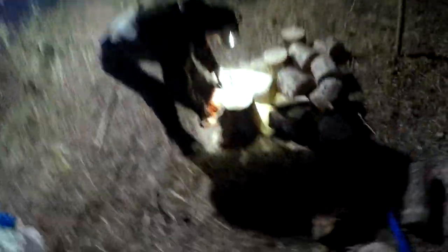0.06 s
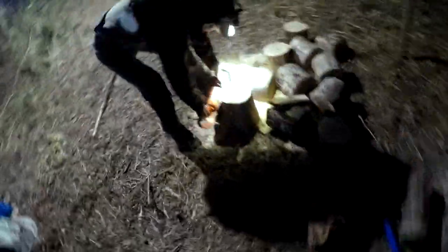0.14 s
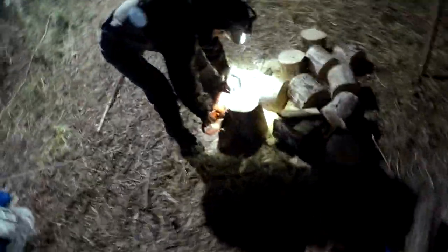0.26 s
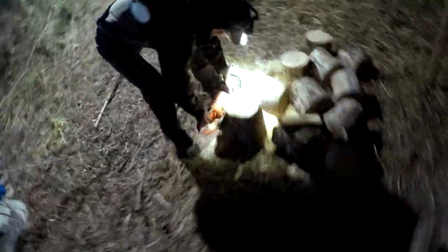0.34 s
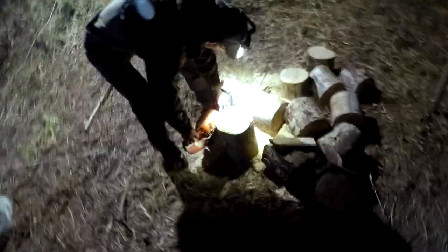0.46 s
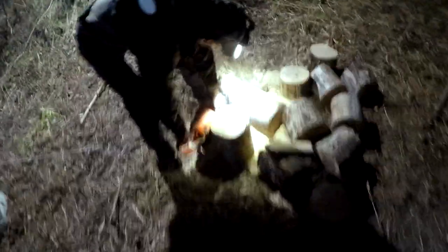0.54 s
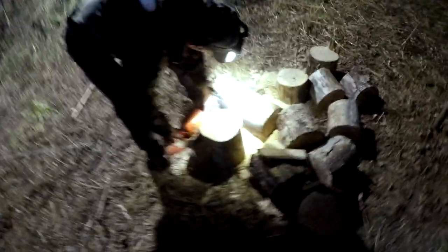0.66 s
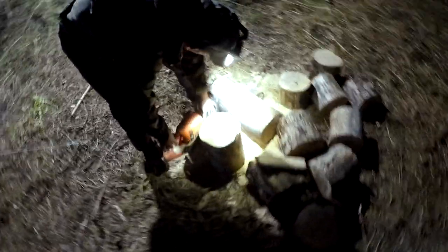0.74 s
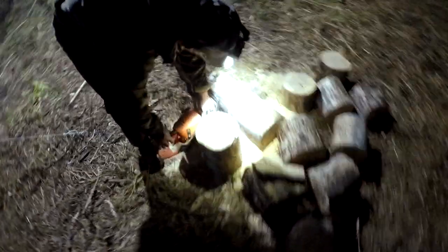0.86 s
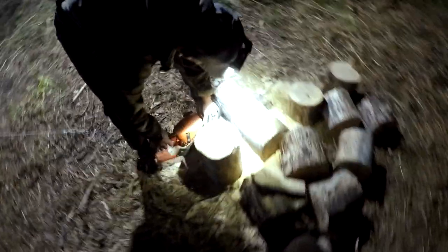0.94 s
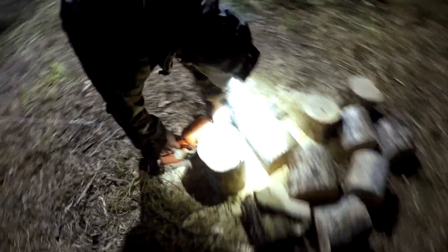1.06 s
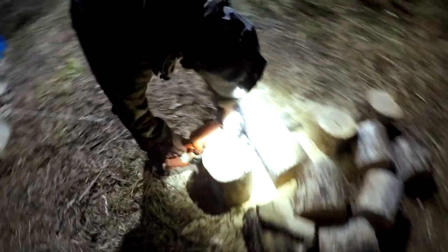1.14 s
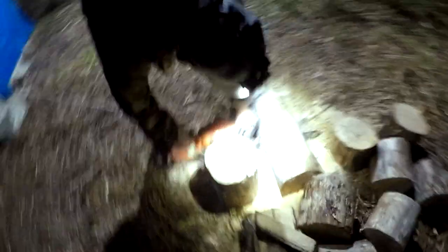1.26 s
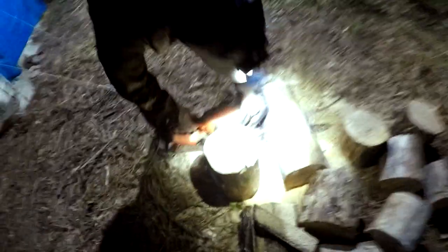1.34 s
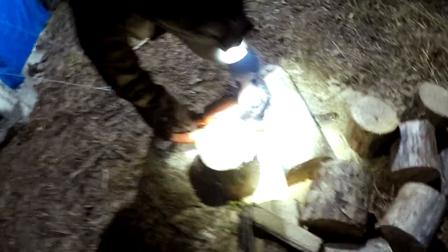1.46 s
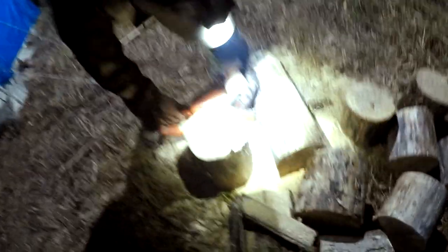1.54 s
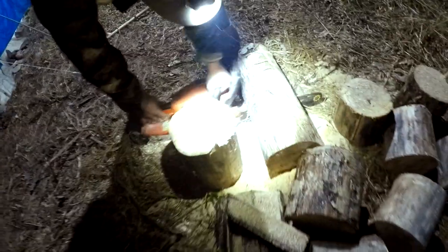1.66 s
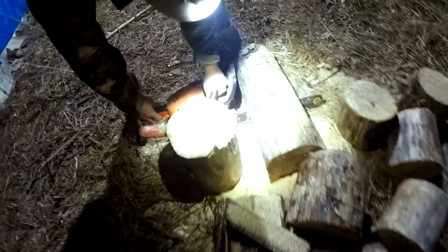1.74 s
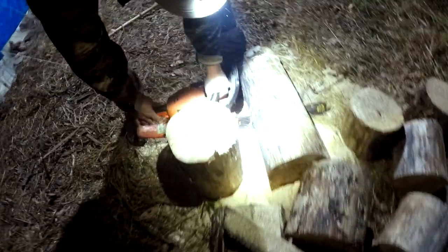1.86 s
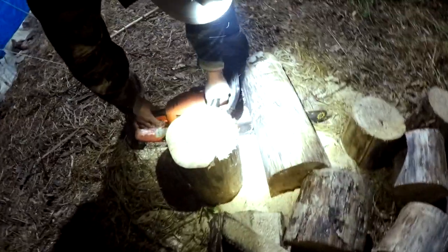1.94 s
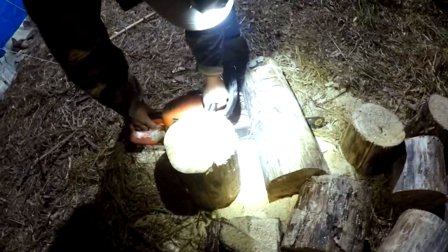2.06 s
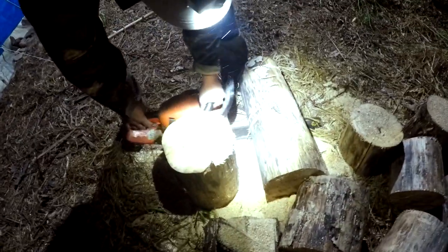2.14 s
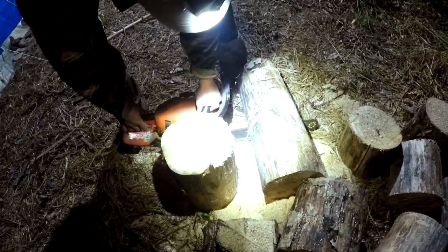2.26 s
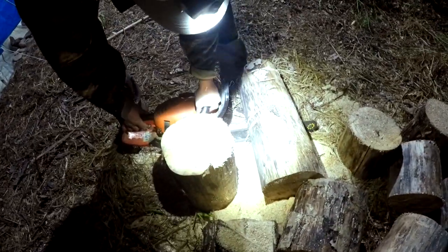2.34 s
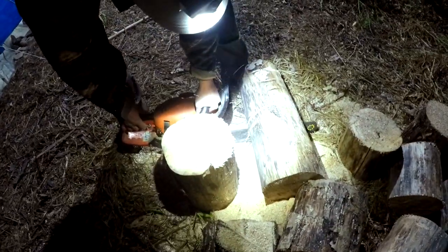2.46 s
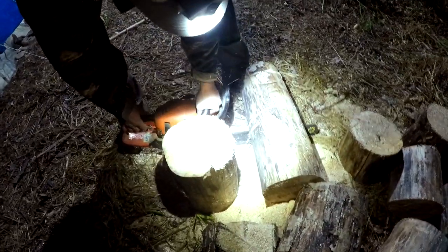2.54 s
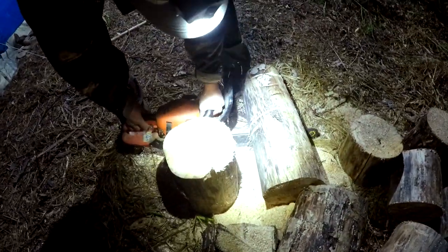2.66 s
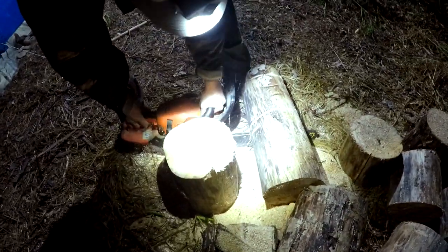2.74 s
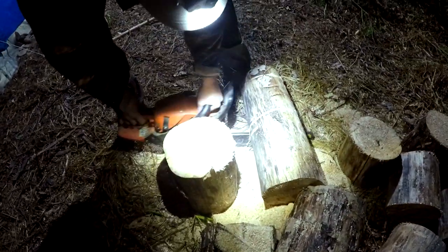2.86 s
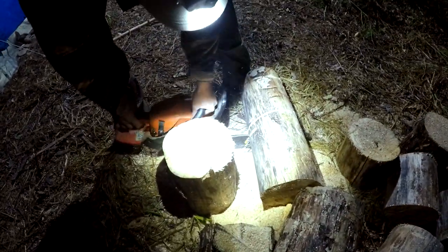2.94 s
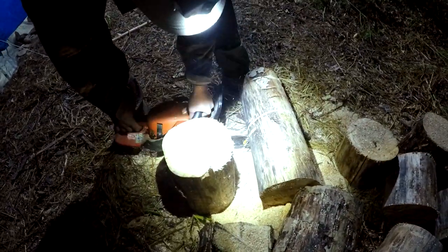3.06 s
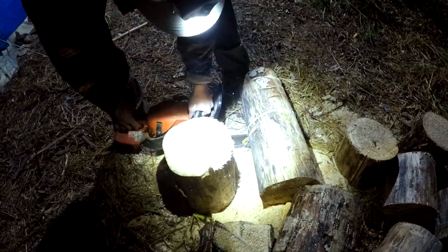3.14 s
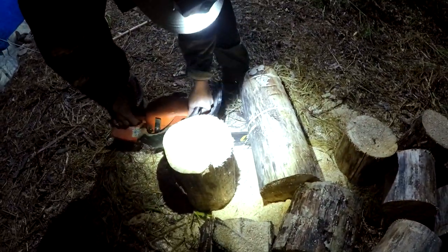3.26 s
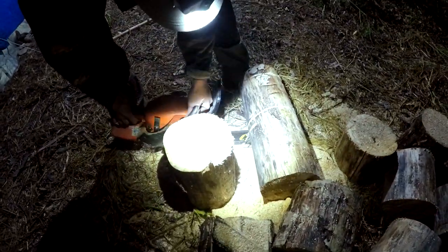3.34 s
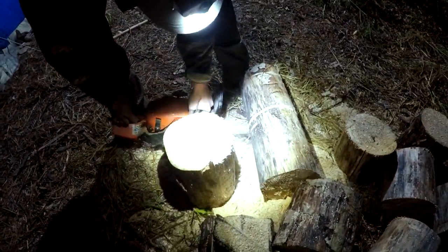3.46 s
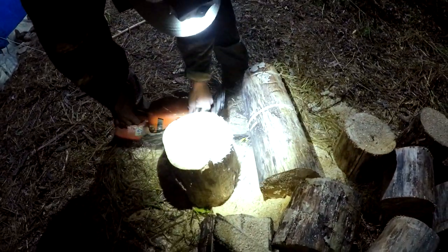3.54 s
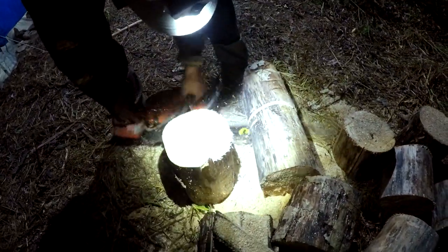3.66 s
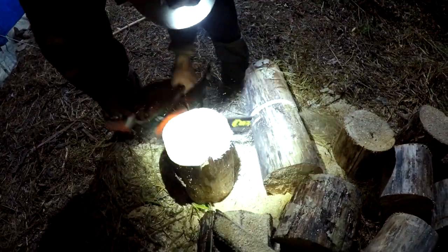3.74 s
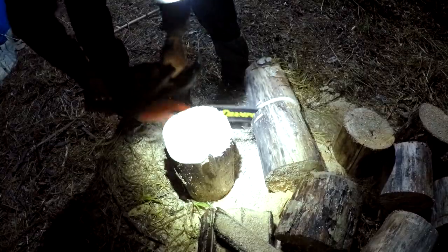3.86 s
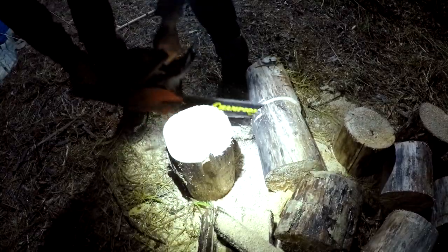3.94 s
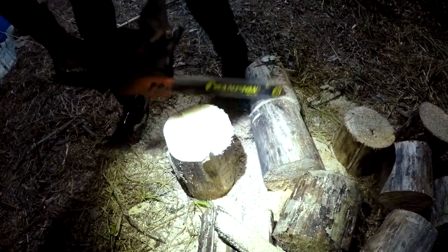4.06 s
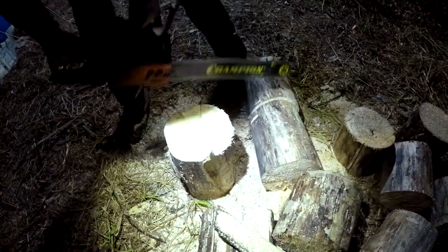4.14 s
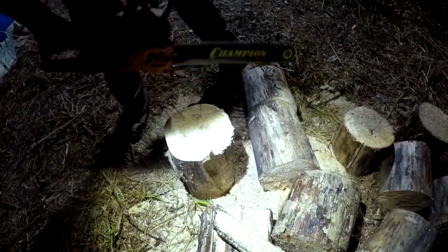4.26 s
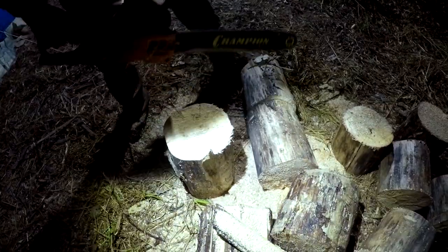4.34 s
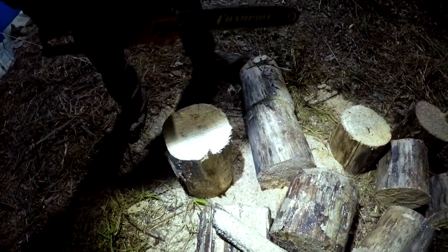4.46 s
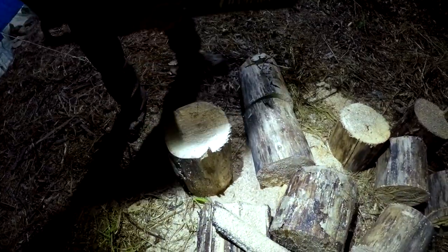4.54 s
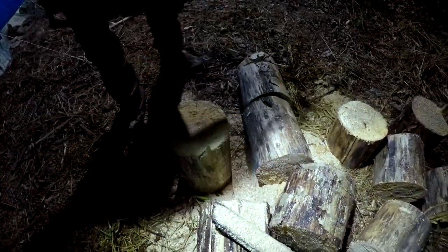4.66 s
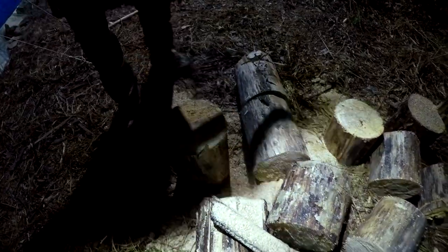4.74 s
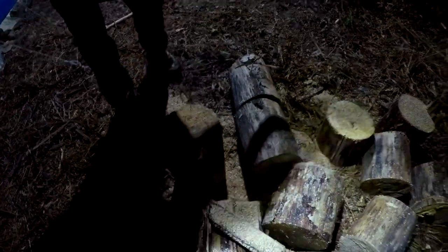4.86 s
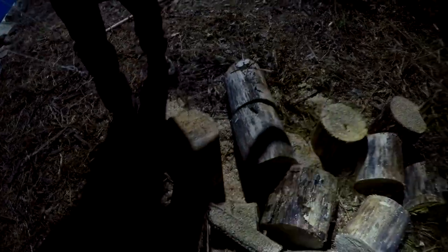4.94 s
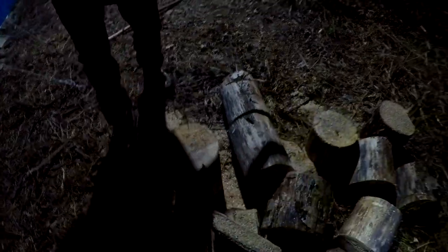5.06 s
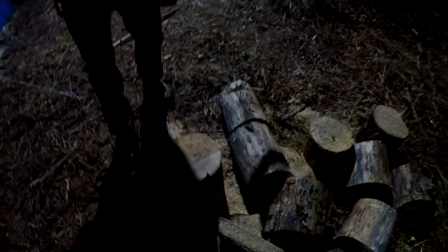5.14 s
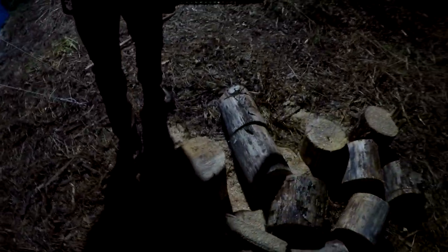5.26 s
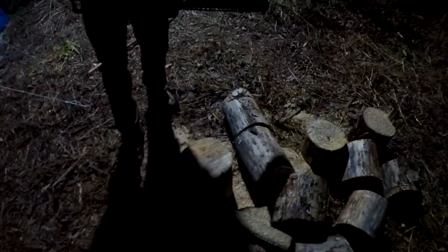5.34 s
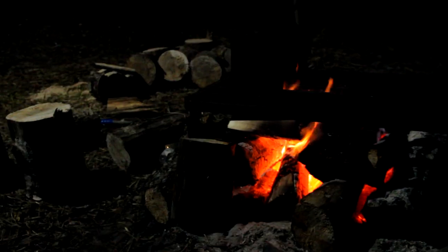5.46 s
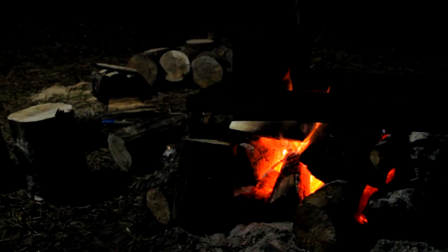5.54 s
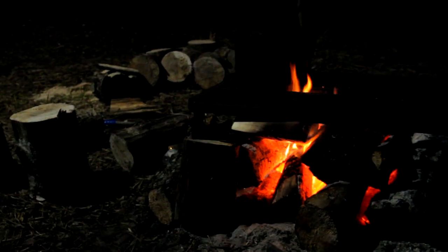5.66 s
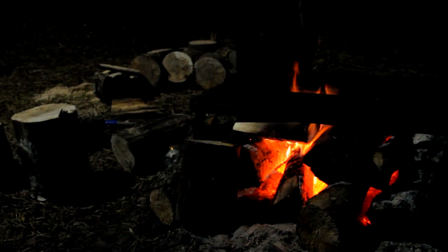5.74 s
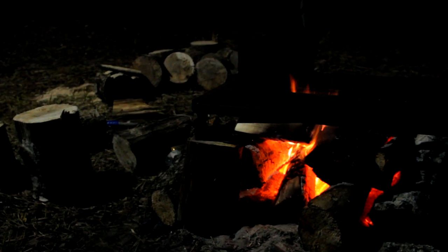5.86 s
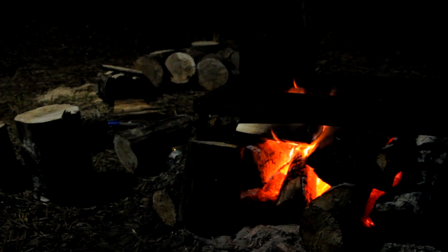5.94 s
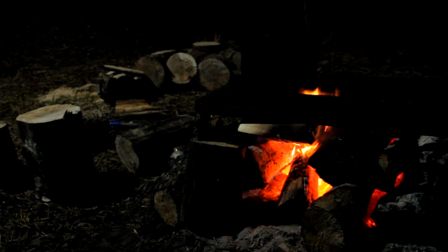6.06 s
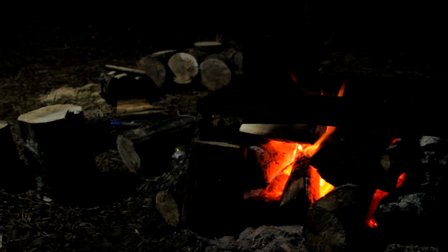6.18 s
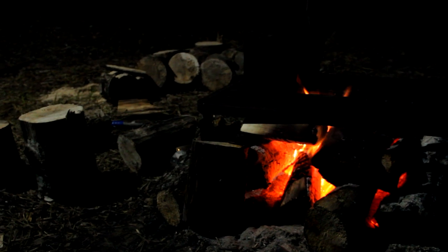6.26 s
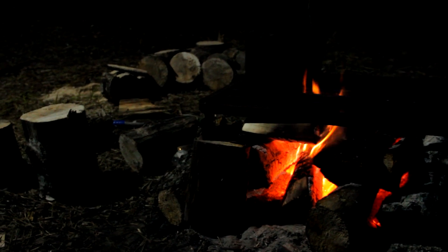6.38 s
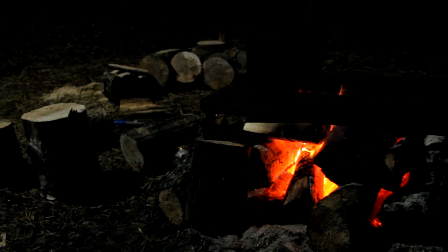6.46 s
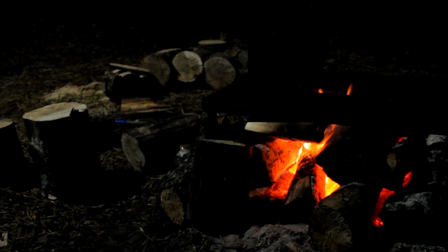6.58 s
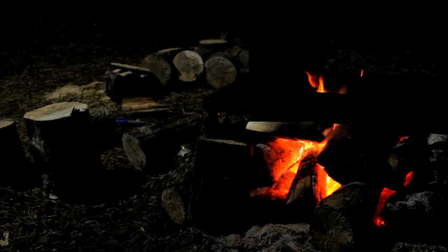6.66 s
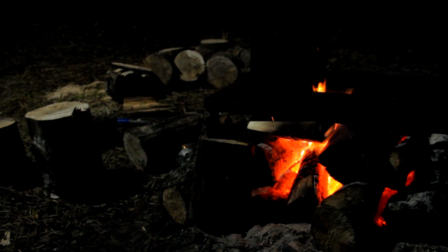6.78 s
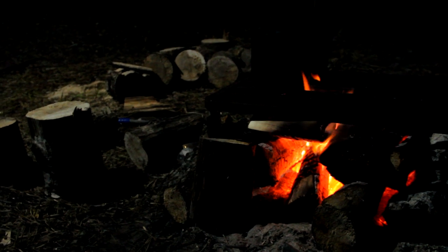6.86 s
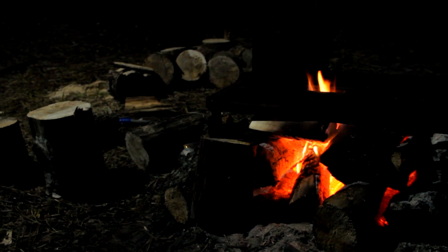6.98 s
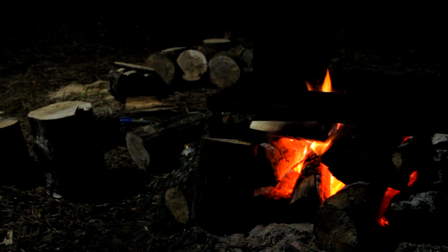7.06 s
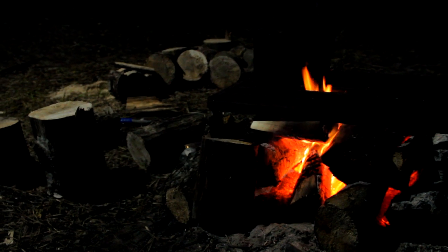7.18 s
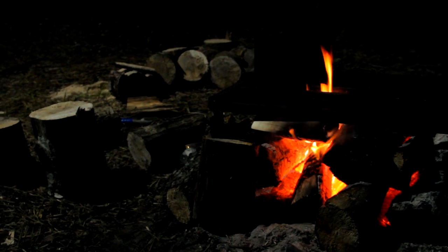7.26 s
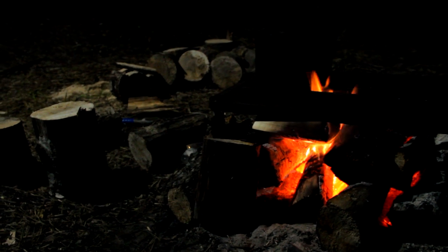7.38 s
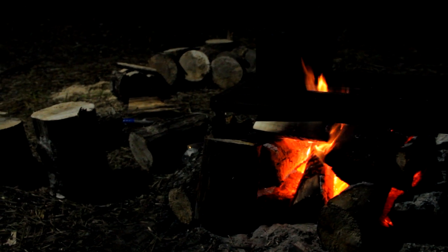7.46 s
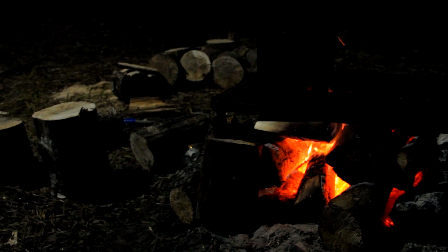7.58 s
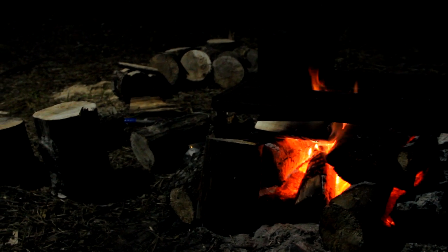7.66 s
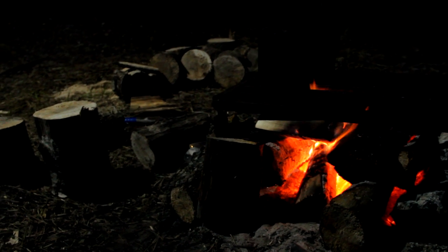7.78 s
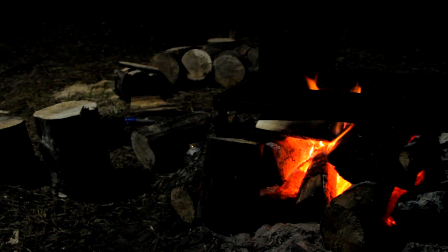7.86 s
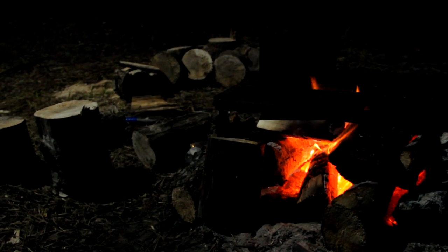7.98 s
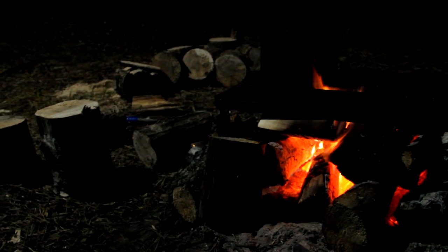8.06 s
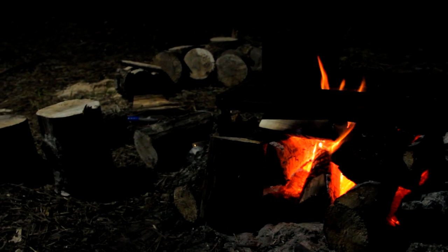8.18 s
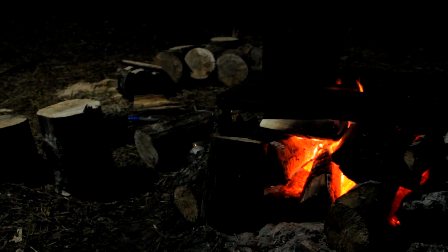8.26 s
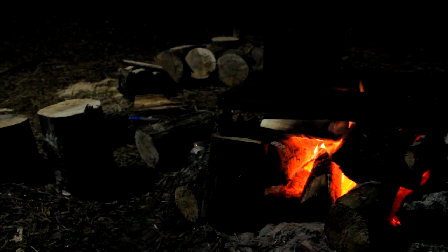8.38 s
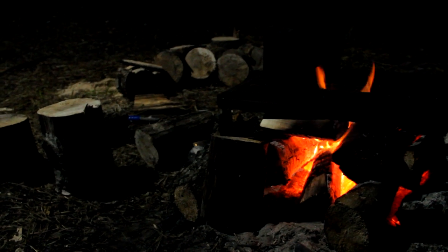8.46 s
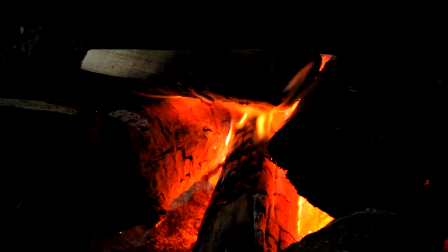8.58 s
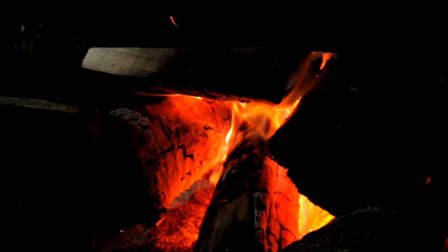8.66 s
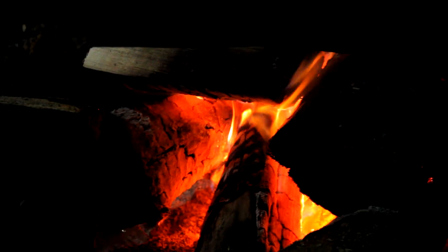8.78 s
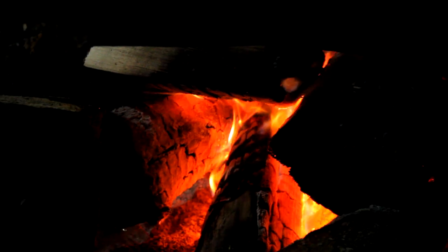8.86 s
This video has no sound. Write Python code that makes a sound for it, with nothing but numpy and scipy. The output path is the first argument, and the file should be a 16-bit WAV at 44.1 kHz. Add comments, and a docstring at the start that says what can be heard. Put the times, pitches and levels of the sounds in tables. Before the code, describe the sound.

A loud, close chainsaw bites through a log in the open air, sagging and recovering while its chain rasps and briefly squeals. The wood gives with a knock, and the engine slows and stalls with last thumps and metallic rattles, uncovering the low drone of a small distant engine. A soft rustle leads into a sudden change to a much quieter spot, where burning wood gently hisses and now and then snaps.

```python
"""Chainsaw and wood stove

A two-stroke chainsaw cuts a log outdoors: exhaust pulses ring its muffler, its chain ticks and squeals,
and its speed sags with the load. It breaks through with a knock, coasts down and stops with a few last
strokes and clanks. Then, abruptly, a quiet spot by a wood stove, where steam hisses and fibres snap.
A small distant engine, probably a generator, drones throughout, heard once the saw no longer masks it."""
import sys
import numpy as np
from scipy import signal
from scipy.fft import rfft, irfft
from scipy.io import wavfile
from scipy.ndimage import uniform_filter1d

SR = 44100
rng = np.random.default_rng(int(sys.argv[2]) if len(sys.argv) > 2 else 0)


def put_to_file(sound):
    """Save the sound as 16-bit audio at rate SR, in the file named by the first command-line argument."""
    columns = np.atleast_2d(sound).T  # one column per channel
    safe = np.clip(columns, -1, 1)
    whole_steps = np.round(safe * 32767)
    wavfile.write(sys.argv[1], SR, whole_steps.astype(np.int16))


N = 393319
T = np.arange(N) / SR

# Crank speed: it sags as the bar is leaned on; out of the wood it hovers at part throttle, then falls.
# Each row: time in seconds, turns per second.
SPEED_CUTTING = [(0.0, 131.8), (0.02, 131.3), (0.1, 135.3), (0.27, 130.9), (0.41, 144.4), (0.55, 138.9),
                 (0.75, 150.7), (1.09, 137.2), (1.21, 137.1), (1.36, 126.2), (1.59, 136.6), (1.71, 139.2),
                 (1.98, 153.5), (2.16, 153.7), (2.54, 142.0), (2.74, 126.6), (2.9, 137.0), (3.19, 133.6),
                 (3.28, 126.8), (3.41, 120.7), (3.53, 110.8), (3.62, 124.7)]
SPEED_RUN_DOWN = [(3.69, 98), (3.75, 91.8), (3.85, 89.8), (4.115, 102), (4.25, 82), (4.39, 62), (4.58, 36)]
# Muffler response: loaded (from behind, then facing it), firing off load, and coasting unfired.
# Each row: frequency in Hz, gain in dB.
MUFFLER_BEHIND = [(250, -44), (430, 2), (550, -23), (700, 0), (820, 6.5), (1000, 5.5), (1200, 2.5),
                  (1480, -16), (1900, -8), (2200, -4), (2600, -13), (3400, -33)]
MUFFLER_FACING = [(250, -24), (335, -3.5), (430, -12), (530, -3.5), (590, -2), (650, 6.5), (700, 5),
                  (750, -0.5), (840, -10.5), (930, -11.5), (1080, -6), (1450, -19), (1650, -15),
                  (2000, -20), (2500, -17), (3400, -42.5)]
MUFFLER_FREE = [(70, -22), (200, 1.5), (290, -7.5), (430, 1.5), (560, 5.5), (720, -4.5), (900, -9),
                (1200, -7), (1550, -11), (2500, -11), (3400, -38)]
MUFFLER_COAST = [(70, -15), (200, -2), (430, -3), (540, -6), (720, 10), (820, -3), (970, -13), (1290, 10),
                 (1550, -17), (3400, -27)]
# Pulse of the exhaust port off load. Each row: multiple of the crank speed, relative level in dB.
PORT_ORDERS = [(3, -4.5), (4, 5.5), (5, -1.5), (6, 3), (7, -2), (8, 3), (9, -7), (10, -1), (11, -4),
               (15, -8.5), (19, -13), (26, -23)]
# The notch that the second harmonic slides through close by. Each row: frequency in Hz, level in dB.
SECOND_NEAR = [(72, -24), (124, -24), (155, -18.5), (200, -18.5), (222, -15.5), (250, -29.5), (268, -21.5),
               (297, -19.5), (308, -19)]
# Spectra of the chain in wood and in air, and of the dull churn of teeth and cooling fan.
# Each row: frequency in Hz, gain in dB.
CHAIN_IN_WOOD = [(820, -26), (1400, -3.5), (2010, -5.5), (2640, -0.5), (2980, -6), (3500, -8.5),
                 (3990, -1.5), (5070, -2), (5900, 3.5), (6460, -1), (7590, -19), (8740, -12), (11200, -35),
                 (12700, -13), (15500, -33)]
CHAIN_IN_AIR = [(820, -24), (1400, -5), (1600, -17), (1800, 0), (2610, -1.5), (3130, -9), (3680, -6.5),
                (3990, -1), (4730, 3), (6270, 2), (7590, -17.5), (8910, -13), (11200, -32.5),
                (12700, -13.5), (15500, -30)]
CHURN_COLOUR = [(25, -32), (70, -16), (130, 5.5), (220, -7.5), (350, -4), (600, -1), (1100, -1.5),
                (1500, -8.5), (2200, -32)]
# Spectra of the outdoor wash and of buffeting air. Each row: frequency in Hz, gain in dB.
WASH_COLOUR = [(30, -16), (90, -6.5), (200, -2.5), (350, -12), (700, -17), (1500, -21.5), (3000, -33.5),
               (5500, -28), (8000, -35.5), (15000, -46)]
GUST_COLOUR = [(10, -12), (30, -3), (80, 0), (130, -5), (1000, -65)]
# Gusts. Each row: time of the peak in seconds, half width in seconds, level in dB.
GUSTS = [(.01, .04, -23), (.39, 0.049, -18), (.565, .04, -14), (.79, 0.054, -21), (1.0, .15, -23),
         (1.25, .03, -22), (3.9, 0.25, -30), (4.85, 0.8, -31), (5.39, 0.14, -27)]
# Three chain squeals and, in the third row, a short pitched knock as the bar breaks through the log.
# Each row: start in seconds, length in seconds, frequency in Hz, peak level in dB.
SQUEALS_AND_KNOCK = [(0.297, 0.25, 2744, -27), (2.66, 0.2, 3260, -35), (3.663, 0.066, 1034, -13.5),
                     (4.486, 0.087, 2550, -21)]
# Last strokes. Each row: start in seconds, relative level in dB, further gain of the thump in dB.
CLANKS = [(4.584, -2.5, 3.5), (4.6164, -1, 1), (4.6655, -2.5, 4), (4.732, -10, 4), (4.8273, -7.5, -7.5),
          (4.859, -13, -2.5), (4.8743, -14.5, -30), (4.9454, -24, -17), (4.9605, -14.5, -3),
          (4.996, -21, -13), (5.025, -24.5, -3), (5.1492, -34.5, 8)]
# Spectra of a chain clank and a piston thump. Each row: frequency in Hz, gain in dB.
CLANK_COLOUR = [(530, -37), (900, -15), (1150, 2.5), (1580, -17), (2600, -1), (3130, -15.5), (5260, 0.5),
                (6660, -2), (7580, -42), (8830, -27), (15000, -46)]
THUMP_COLOUR = [(29, -40), (50, -2), (97, 2.5), (309, -4.5), (388, 0), (492, -24), (609, -2), (932, -25),
                (1200, -22), (1560, -44), (2640, -120)]
# Modes of the bar. Each row: frequency in Hz, relative level in dB, time to fall 60 dB in seconds.
BAR_MODES = [(1170, -14, .03), (2220, 1, .04), (2643, 1, 0.055), (4070, 6.5, 0.059), (4560, 3, .055),
             (4770, 6, 0.026), (5390, 5, 0.026), (5860, 5, 0.044), (6280, 4.5, 0.046)]
# Single notes of the bar that ring on once the chain is slack.
# Each row: start in seconds, frequency in Hz, peak level in dB, time to fall 60 dB in seconds.
BAR_TINGS = [(4.878, 4670, -27, 0.15), (5.03, 4480, -36, 0.36)]
# Envelope of the scuff. Each row: time in seconds, level in dB.
SCUFF_ENVELOPE = [(5.2, -90), (5.33, -48), (5.44, -41), (5.46, -36.5), (5.47, -90)]
# Its spectrum. Each row: frequency in Hz, gain in dB.
SCUFF_COLOUR = [(300, -7), (1000, -1), (3000, -11), (5000, -1), (6300, 0), (7500, -17), (15000, -24)]
# Harmonics of the distant engine. Each row: multiple of the cycle rate, relative level in dB.
DRONE_ORDERS = [(2, -9), (3, -2), (4, -45), (6, -3), (7, -15), (8, -6.5), (9, -11), (10, -26.5), (11, -39),
                (12, -22), (13, -29), (15, -24)]
# Swells of its fifth order. Each row: time of the peak in seconds, half width in seconds, level in dB.
FIFTH_SWELLS = [(5.5, .15, -38.5), (6.2, 0.31, -33), (6.9, 0.33, -35.5), (8.22, 0.21, -33.5),
                (8.9, 0.22, -40)]
# Spectra of the fire's hiss and snaps. Each row: frequency in Hz, gain in dB.
HISS_COLOUR = [(150, -46.5), (250, 4), (287, 1), (324, -13), (366, 0), (399, -5), (443, -5.5), (500, -13),
               (606, -4), (1810, -10.5), (3260, -4), (5580, -17.5), (8170, -19.5), (10200, -21.5),
               (15800, -20.5)]
SNAP_COLOUR = [(1500, -27), (3300, 6), (4500, -9), (8500, -2), (12000, -7), (16000, -1)]
# Snaps of burning wood. Each row: start in seconds, relative level in dB.
SNAPS = [(5.5189, -29), (6.336, -25), (6.409, -15.5), (6.461, -23), (8.109, -23), (8.6796, -23)]
# Stereo spread. Each row: frequency in Hz, level of the side signal relative to the mid in dB.
STEREO_WIDTH = [(7000, -87), (10500, -35), (12000, -2.5), (15500, -18)]

WALK_ROUND_S = 1.05  # the listener walks round to the muffler side over this time
APPROACH_S, APPROACH_TAKES_S = 0.73, 0.39  # and steps up close
THROUGH_S, EASE_S, CLEAR_S = 3.6, 0.14, 0.041  # the bar breaks through; times to ease off and clear the wood
TEAR_S, TEAR_HALF_S, TEAR_DB = 3.69, 0.068, -22  # the last fibres tear with a dull rush
SHUT_S, SHUT_TAKES_S = 4.11, 0.041  # the throttle closes
STALL_S, RUN_OUT_S = 4.563, 0.38  # the engine stalls and the chain runs out
STOVE_S = 5.468  # the scene changes to the stove

ROUGH_FAR, ROUGH_CUT, ROUGH_FREE, ROUGH_COAST = 0.15, 0.06, 0.44, 0.19  # unevenness of the burning, 0-1
SKIP_FREE, SKIP_COAST = 0.94, 0.09  # tendency to fire only on every second turn, 0-1
BOOM_DB, BOOM_FREE_DB, BOOM_CORNER_HZ = -8, -13.5, 78  # the fundamental radiates poorly below the corner
BARK_FAR_DB, BARK_CUT_DB, BARK_FREE_DB, BARK_COAST_DB = -19, -16, -15.5, -13
LUG_HZ, UNLOAD_DB_PER_HZ = 133.4, 0.25  # above this speed the bark softens
LIMP_HZ, LIMP_DB_PER_HZ = 77, 0.15  # below this speed the exhaust puffs weaken
CHAIN_FAR_DB, CHAIN_CUT_DB, CHAIN_FREE_DB, CHAIN_COAST_DB = -20.5, -18.5, -16, -16
BOG_HZ, BOG_DB_PER_HZ = 125, 0.12  # below this speed the chain cuts less
SINK_DB_PER_S = 0.31  # the kerf muffles the chain as the bar sinks in


def amp(db):
    """Amplitude ratio of a level in decibels."""
    return 10 ** (np.asarray(db) / 20)


def unit(x):
    """Normalisation to an rms of 1."""
    return x / np.sqrt(np.mean(x ** 2) + 1e-20)


def steady(x, size=4000):
    """Division by the running rms holds the level at 1 and leaves the fast pulsing."""
    power = uniform_filter1d(uniform_filter1d(x ** 2, size), size // 2)
    return x / np.sqrt(abs(power) + 1e-12)


def lookup(x, rows):
    """Linear interpolation in a two-column table."""
    return np.interp(x, *np.transpose(rows))


def ramp(start_s, takes_s):
    """Linear transition from 0 to 1."""
    return np.clip((T - start_s) / takes_s, 0, 1)


def staged(values, changes):
    """Interpolation from each value to the next as its 0-1 change comes."""
    out = values[0]
    for value, change in zip(values[1:], changes):
        out = out + (value - out) * change
    return out


def swells(rows):
    """Gain made of Gaussian swells that add in power."""
    return np.sqrt(sum(amp(db) ** 2 * np.exp(-2 * ((T - s) / width) ** 2) for s, width, db in rows))


def blend(a, b, share):
    """Equal-power crossfade from a to b."""
    share = np.clip(share, 0, 1)
    return np.sqrt(1 - share) * a + np.sqrt(share) * b


def add(mix, start_s, sound):
    """Superposition of a sound on the mix."""
    part = mix[round(start_s * SR):][:len(sound)]
    part += sound[:len(part)]


def wander(hz):
    """Random fluctuation of rms 1: noise low-passed at the given rate."""
    f = np.fft.rfftfreq(N, 1 / SR)
    return unit(irfft(rfft(rng.standard_normal(N)) / (1 + (f / hz) ** 4), N))


def colour(x, points, size=4096):
    """Minimum-phase filter through the given points of frequency and gain."""
    hz, db = np.transpose(points)
    f = abs(np.fft.fftfreq(size, 1 / SR))
    log_gain = np.log(amp(np.interp(np.log(f + 1), np.log(hz + 1), db)))
    response = np.exp(np.conj(signal.hilbert(log_gain)))
    taps = np.fft.ifft(response).real[:size // 2]
    return signal.oaconvolve(x, taps)[:len(x)]


def noise(points):
    """Gaussian noise of rms 1 with the given spectrum."""
    return unit(colour(rng.standard_normal(N), points))


def patchy(x, depth_db, bins=7, frames=40):
    """Random spectral modulation: the colour shifts in slow, narrow patches."""
    spectra = signal.stft(x, nperseg=1024, noverlap=768)[2]
    field = uniform_filter1d(rng.standard_normal(spectra.shape), bins, axis=0)
    field = unit(uniform_filter1d(field, frames, axis=1))
    return signal.istft(spectra * amp(depth_db * field), nperseg=1024, noverlap=768)[1][:N]


def boom(turns, hz, near, free, skipping, second_far_db=-15.7, burble_db=-6):
    """Periodic firing radiates two low harmonics; period doubling by skipped firings adds order 3/2."""
    angle = 2 * np.pi * turns
    first_db = staged([BOOM_DB, BOOM_FREE_DB], [free]) - 10 * np.log10(1 + (BOOM_CORNER_HZ / hz) ** 7)
    second_db = staged([second_far_db, lookup(2 * hz, SECOND_NEAR)], [near])
    first = amp(first_db + 0.24 * wander(40)) * np.cos(angle - 0.4)
    second = amp(second_db + 1.2 * wander(69)) * np.cos(2 * angle - 1.3)
    burble = skipping * amp(first_db + burble_db + 3.5 * wander(25)) * np.cos(3 * angle / 2)
    return np.sqrt(2) * (first + second + burble)


def exhaust(turns, bark_db, rough, free, skipping, puff_turns=0.52, port_lag_turns=0.035):
    """Source and filter: one uneven pulse and a puff of gas per turn excite the muffler's resonances."""
    shaky_turns = turns + 0.03 * rough * wander(70)
    count = np.floor(shaky_turns)
    strength = (1 + rough * wander(85)) * (1 + 0.5 * skipping * np.cos(np.pi * turns))
    pulses = np.diff(count, prepend=count[0]) * strength
    puffs = steady((0.28 + np.exp(-(turns % 1) / puff_turns)) * rng.standard_normal(N))
    drive = patchy((1 - rough) * steady(pulses) + rough * puffs, depth_db=2.5)
    behind, facing = unit(colour(drive, MUFFLER_BEHIND)), unit(colour(drive, MUFFLER_FACING))
    loaded = blend(behind, facing, ramp(0, WALK_ROUND_S))
    # Off load the port shapes the pulse, so its spectral pattern falls with the speed.
    cycle, orders = np.linspace(0, 1, 512), np.arange(3, 27)
    shape = -amp(lookup(orders, PORT_ORDERS)) @ np.cos(2 * np.pi * np.outer(orders, cycle))
    port = unit(np.interp((shaky_turns - port_lag_turns) % 1, cycle, shape) * strength)
    coasting, firing = ((1 - rough) * steady(colour(port, muffler)) + rough * steady(colour(puffs, muffler))
                        for muffler in (MUFFLER_COAST, MUFFLER_FREE))
    unloaded = blend(coasting, firing, skipping)
    return amp(bark_db) * steady(blend(steady(loaded), unloaded, free))


def chain(turns, hz, chain_db, free, links_per_s=5000, slap_hz=54, slap_turns=0.65):
    """Impact noise: links and teeth tick on bar and wood; each turn jerks them, more so at low speed."""
    ticks = rng.standard_normal(N) * (rng.random(N) < links_per_s / SR)
    ticks *= amp(-0.5 * np.minimum(rng.exponential(1, N), 4))
    # The drive train rasps alike on every turn, which gives faint high harmonics.
    pattern = rng.standard_normal(256)
    rasp = np.interp(turns + 0.0023 * wander(40), np.arange(256) / 256, pattern, period=1)
    jerk_phase = turns + 0.12
    jerk_size = (jerk_phase < 0) * (slap_hz / hz) ** 2 * amp(1.2 * wander(50))
    jerk = jerk_size * np.exp(-(jerk_phase % 1) / slap_turns)
    contact = unit(ticks) + 0.91 * rng.standard_normal(N) + 0.67 * (1 - free) * rasp
    flapping = amp((0.42 + 0.94 * free) * wander(57))  # a free chain flaps unevenly
    drive = patchy(contact * (0.62 + jerk) * flapping, depth_db=1.94)
    in_wood, in_air = unit(colour(drive, CHAIN_IN_WOOD)), unit(colour(drive, CHAIN_IN_AIR))
    return amp(chain_db - 0.45) * steady(blend(in_wood, in_air, free))


def chainsaw(chain_nears_s=1, churn_db=-5, slack_db=-2.5):
    """Forced vibration: one crank drives boom, exhaust and chain, whose levels follow speed and throttle."""
    hz = lookup(T, list(SPEED_CUTTING) + list(SPEED_RUN_DOWN))
    turns = np.cumsum(hz * (1 + 0.002 * wander(25))) / SR
    turns -= np.interp(CLANKS[0][0], T, turns)  # the last strokes follow on in step
    near = ramp(APPROACH_S, APPROACH_TAKES_S)
    free = ramp(THROUGH_S, EASE_S)
    coast = ramp(SHUT_S, SHUT_TAKES_S)
    rough = staged([ROUGH_FAR, ROUGH_CUT, ROUGH_FREE, ROUGH_COAST], [near, free, coast])
    skipping = free * staged([SKIP_FREE, SKIP_COAST], [coast])

    bark_db = staged([BARK_FAR_DB, BARK_CUT_DB, BARK_FREE_DB, BARK_COAST_DB], [near, free, coast])
    bark_db -= UNLOAD_DB_PER_HZ * np.maximum(hz - LUG_HZ, 0)
    bark_db -= LIMP_DB_PER_HZ * np.maximum(LIMP_HZ - hz, 0)
    bite_db = CHAIN_CUT_DB - SINK_DB_PER_S * T - BOG_DB_PER_HZ * np.maximum(BOG_HZ - hz, 0)
    chain_db = staged([CHAIN_FAR_DB, bite_db, CHAIN_FREE_DB, CHAIN_COAST_DB],
                      [ramp(0, chain_nears_s), ramp(THROUGH_S, CLEAR_S), coast])

    low_orders = boom(turns, hz, near, free, skipping)
    tearing = swells([(TEAR_S, TEAR_HALF_S, TEAR_DB)])
    churn = (amp(chain_db + churn_db) + tearing) * noise(CHURN_COLOUR)
    engine = low_orders + exhaust(turns, bark_db, rough, free, skipping)
    stalled = ramp(STALL_S, 0.017)
    run_out = (1 - ramp(STALL_S, RUN_OUT_S)) ** 2 * amp(slack_db * stalled)  # unpulled, the chain slackens
    return (1 - stalled) * engine + run_out * (churn + chain(turns, hz, chain_db, free))


def outdoor_air(by_logs_db=-37, by_stove_db=-43):
    """Ambient noise: a low wash and, by the logs, turbulence buffeting a carried microphone."""
    wash, air = noise(WASH_COLOUR), noise(GUST_COLOUR)
    buffet = swells(GUSTS) * amp(1.5 * wander(12)) * air
    return np.where(T < STOVE_S, amp(by_logs_db) * wash + buffet, amp(by_stove_db) * wash)


def squeals_and_knock(waver_hz=35):
    """Frequency-modulated tones: three chain squeals, and a pitched knock as the bar breaks through."""
    out = np.zeros(N)
    for start, length, hz, db in SQUEALS_AND_KNOCK:
        swell = np.sin(np.pi * ramp(start, length))
        angle = 2 * np.pi * np.cumsum(hz + waver_hz * wander(108)) / SR
        out += amp(db) * swell * np.sin(angle)
    return out


def clanks(rise_s=0.0051, thump_lag_s=0.0037, clank_t60=0.051, thump_t60=0.1,
           clank_db=-10, thump_db=-7, ring_db=-10):
    """Impacts of the slack chain excite the bar's modes; the piston's last compressions thump just after."""
    rattle, thump, tings = np.zeros((3, N))
    t = np.arange(SR // 2) / SR
    attack = np.minimum(t / rise_s, 1)
    for start, db, low_db in CLANKS:
        add(rattle, start, attack * amp(db - 60 * np.maximum(t - rise_s, 0) / clank_t60))
        add(thump, start + thump_lag_s, attack * amp(db + low_db - 60 * t / thump_t60))
    for start, hz, db, t60 in BAR_TINGS:
        add(tings, start, amp(db - 60 * t / t60) * np.sin(2 * np.pi * hz * t))
    links = rng.standard_normal(N)
    bar = sum(amp(db - 60 * t / t60) * np.sin(2 * np.pi * hz * t) for hz, db, t60 in BAR_MODES)
    ring = amp(ring_db) * signal.oaconvolve(rattle * links, bar / np.linalg.norm(bar))[:N]
    crack = amp(clank_db) * rattle * unit(colour(links, CLANK_COLOUR))
    return crack + ring + tings + amp(thump_db) * thump * noise(THUMP_COLOUR)


def scuff():
    """Friction noise: a soft, bright rub of clothing or boots."""
    return noise(SCUFF_COLOUR) * amp(lookup(T, SCUFF_ENVELOPE) + 2.5 * wander(80))


def distant_engine(cycle_hz=24.88, gain_db=-37.2, waver_db=2.15):
    """Harmonic series of a governed four-stroke: only low orders arrive, each wavering on its way."""
    angle = 2 * np.pi * np.cumsum(cycle_hz * (1 + 0.0028 * wander(5.9))) / SR
    orders = sum(amp(db + waver_db * wander(2.3)) * np.cos(k * angle) for k, db in DRONE_ORDERS)
    fifth = swells(FIFTH_SWELLS) * np.cos(5 * angle)
    return -np.sqrt(2) * (amp(gain_db) * orders + fifth)


def fire(hiss_db=-40.5, snap_db=-6, snap_t60=0.012, tail_t60=0.05):
    """Flow noise and fracture: steam hisses out of burning wood, and now and then a fibre snaps."""
    hiss = amp(hiss_db + 0.5 * wander(27)) * noise(HISS_COLOUR)
    bursts, t = np.zeros(N), np.arange(SR // 20) / SR
    decay = amp(-60 * t / snap_t60) + 0.07 * amp(-60 * t / tail_t60)
    for start, db in SNAPS:
        add(bursts, start, amp(db) * decay)
    return (T >= STOVE_S) * (hiss + amp(snap_db) * bursts * noise(SNAP_COLOUR))


def scene():
    """The sources superpose in the centre; only the top octave scatters differently to each side."""
    mid = chainsaw() + squeals_and_knock() + clanks() + scuff() + distant_engine() + outdoor_air() + fire()
    scatter = np.sqrt(2) * np.sin(2 * np.pi * np.cumsum(300 * wander(200)) / SR)
    side = colour(mid, STEREO_WIDTH) * scatter
    return np.array([mid + side, mid - side])


def record(dry):
    """Soft saturation rounds the peaks just under full scale; a low-pass ends the band at 15.7 kHz."""
    rounded = 0.97 * dry / (1 + abs(dry) ** 8) ** (1 / 8)
    low_pass = signal.firwin(511, 15700, window=("kaiser", 9), fs=SR)
    return signal.oaconvolve(rounded, low_pass[None], "same")


dry = scene()
out = record(dry)
put_to_file(out)
```